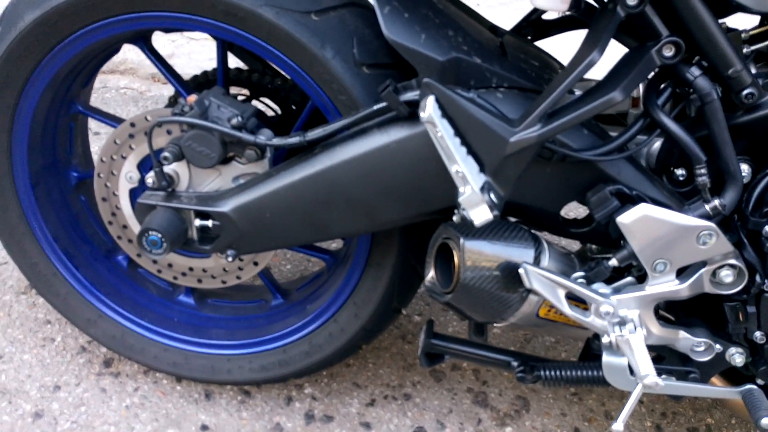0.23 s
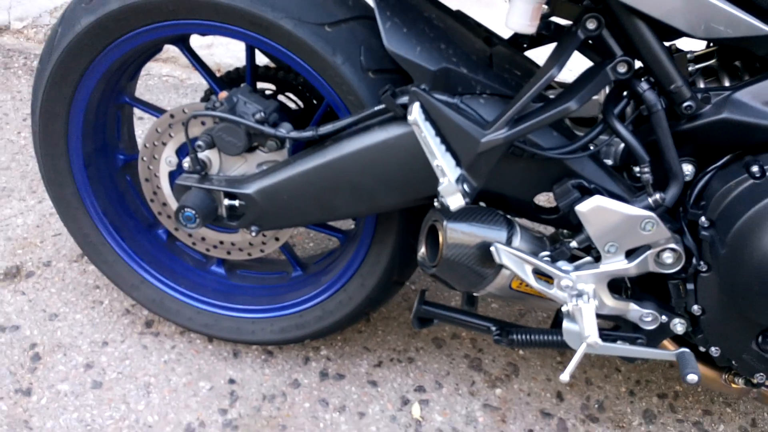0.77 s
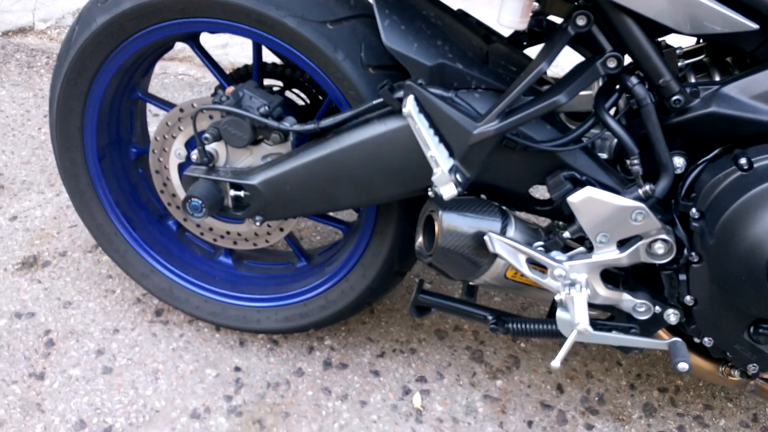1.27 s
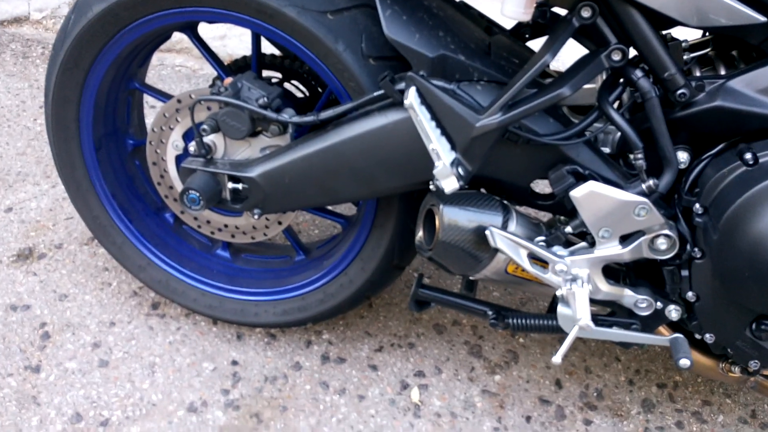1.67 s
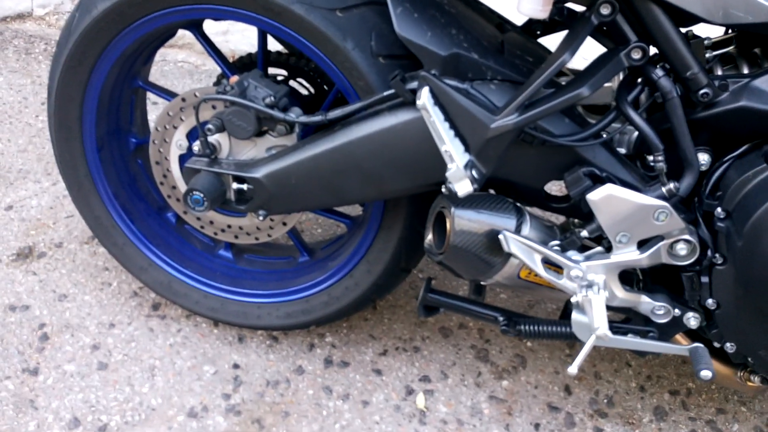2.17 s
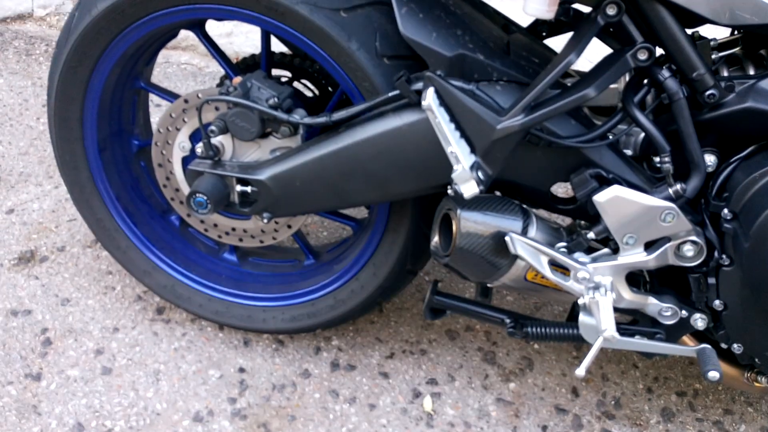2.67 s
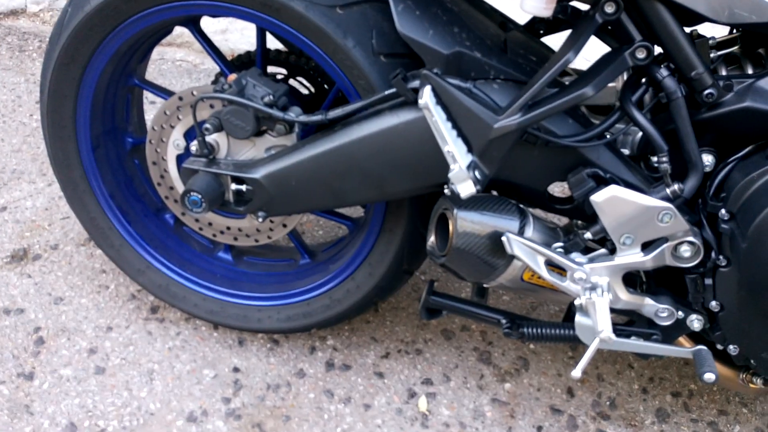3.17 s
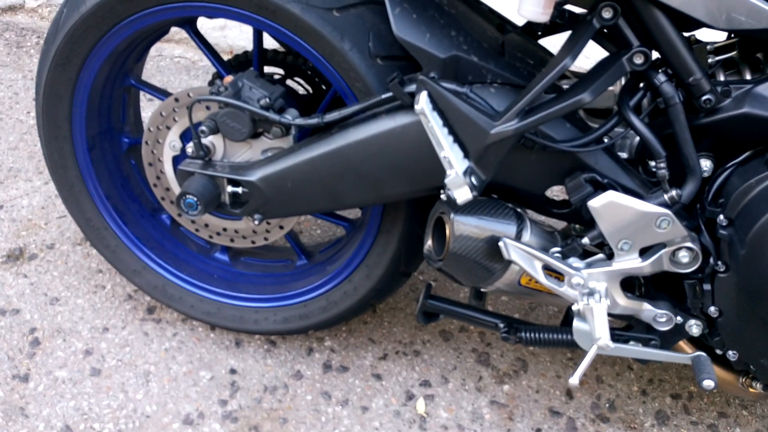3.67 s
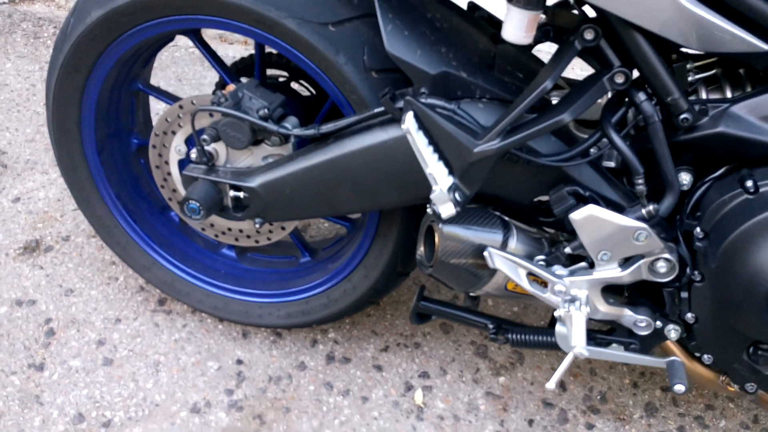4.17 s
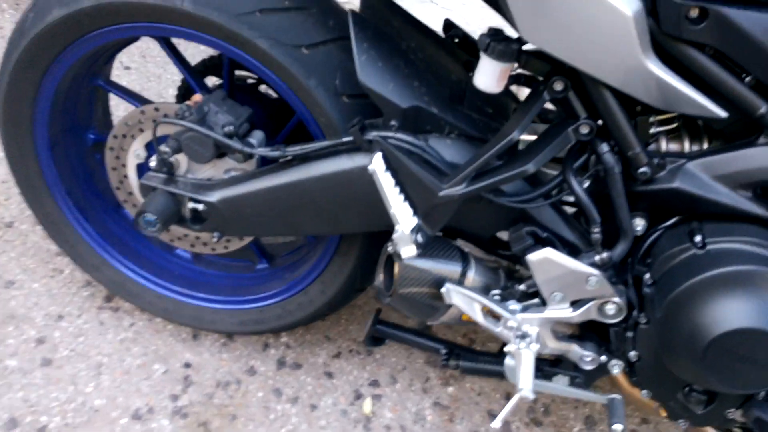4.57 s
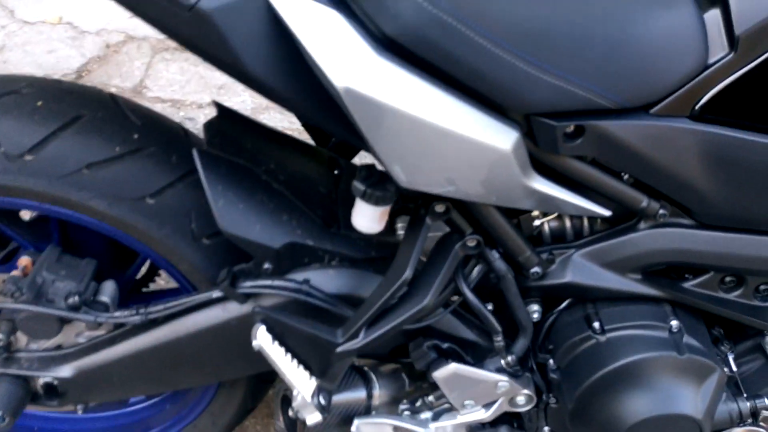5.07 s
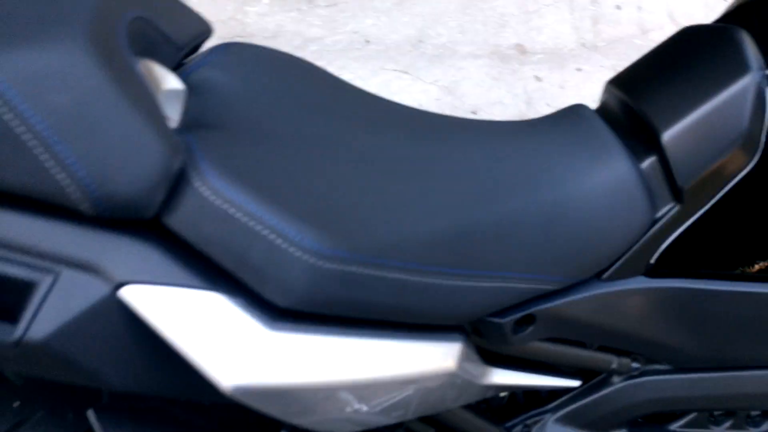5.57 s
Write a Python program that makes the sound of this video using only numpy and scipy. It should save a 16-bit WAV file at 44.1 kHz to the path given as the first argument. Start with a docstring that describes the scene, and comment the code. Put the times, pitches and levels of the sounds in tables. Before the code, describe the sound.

A parked three-cylinder motorcycle is revved in two quick double blips and one final single blip. Each barks sharply through the exhaust, then falls away in a drone with gurgling, backfire pops and, once, a hard knock. The engine finally drops to a quieter, stumbling idle with ticking valves. It is outdoors, on a phone microphone close to the silencer that slightly overloads on the peaks.

```python
"""A three-cylinder motorcycle on its stand is blipped five times, then drops to a stumbling idle.
On throttle, sharp firings bark through the pipe; off throttle, the cylinders pump a smooth falling
drone and unburnt fuel pops, with one hard knock. Gas rasps and gurgles; valves and chain clatter on top.
A phone close to the silencer catches exhaust wind, overloads on the loudest peaks and swings away at idle."""
import sys
import numpy as np
from scipy import signal
from scipy.fft import rfft, irfft
from scipy.io import wavfile
from scipy.ndimage import uniform_filter1d

SR = 44100
rng = np.random.default_rng(int(sys.argv[2]) if len(sys.argv) > 2 else 0)


def digitize_waveform(pressure):
    """Quantize a signal to 16-bit integers and store it at the path in sys.argv[1].

    Rows of a 2-D input are taken as channels; values are limited to [-1, 1].
    """
    field = np.atleast_2d(pressure).T
    bounded = np.clip(field, -1, 1)
    quanta = np.round(bounded * 32767).astype(np.int16)
    wavfile.write(sys.argv[1], SR, quanta)


N = 256220
T = np.arange(N) / SR
IDLE_START_S, IDLE_HZ = 4.1665, 29.8
BURBLE_HZ = 117  # below this firing rate some cycles half burn with the throttle shut
UNFUELLED_DB = -30  # a slug level below this means no fuel


def undb(db):
    """Decibels to gain."""
    return 10 ** (np.asarray(db) / 20)


def unit(x):
    """Scale each channel to RMS 1."""
    return x / np.sqrt(np.mean(x ** 2, axis=-1, keepdims=True))


def curve(hz, table):
    """Read (frequency, value) rows on a log-frequency axis."""
    f, value = np.transpose(table)
    return np.interp(np.log(np.maximum(hz, 1)), np.log(f), value)


def band(x, hz, width):
    """Resonance with gain 1 at the centre."""
    return signal.lfilter(*signal.iirpeak(hz, hz / width, SR), x)


def low(x, hz):
    """Two-pole low-pass."""
    return signal.lfilter(*signal.butter(2, hz, fs=SR), x)


def tail(kicks, decay_s):
    """Give each kick an exponential decay."""
    return signal.lfilter([1], [1, -np.exp(-1 / (decay_s * SR))], kicks)


def noise(colour, mono_hz):
    """Coloured stereo noise at RMS 1, narrowing to mono below mono_hz."""
    f = np.fft.rfftfreq(N, 1 / SR)
    mid, side = rfft(rng.standard_normal((2, N)))
    alike = 1 / (1 + (f / mono_hz) ** 2)
    mid, side = mid * np.sqrt(1 + alike), side * np.sqrt(1 - alike)
    return unit(irfft(undb(curve(f, colour)) * np.array([mid + side, mid - side]), N))


def wander(hz):
    """Smoothed random sample-and-hold; spread near 1."""
    hold = int(SR / hz)
    steps = np.repeat(rng.standard_normal(N // hold + 1), hold)
    return 1.53 * uniform_filter1d(uniform_filter1d(steps, hold), hold)[:N]


def clicks(times, gains):
    """Single-sample kicks."""
    return np.bincount(np.clip((np.asarray(times) * SR).astype(int), 0, N - 1), gains, N)


def bump(s, width_s):
    """Bell-shaped swell in time."""
    return np.exp(-.5 * ((T - s) / width_s) ** 2)


# Throttle blips: open t/s, shut t/s, top rate/Hz, drag build-up/s, drag share,
# first slug/dB, last slug/dB, first blast/dB, last blast/dB, roar/dB
THROTTLE_BLIPS = [(.081, 0.195, 128.2, 0.19, 0.99, 0, -2, -11, -5.5, -18.5),
                  (.327, 0.451, 206.8, .1, 1.0, -12, -6, -4.5, -2, -14),
                  (1.639, 1.753, 117.4, .1, 0.98, -2, -0.5, -27, -6, -21.5),
                  (1.875, 1.984, 186.6, .03, 0.99, -3, -8, -6, -2.5, -16.5),
                  (3.089, 3.219, 130.8, .06, 0.99, -0.2, -2, -20.5, -5.5, -20)]
# Idle stumbles: t/s, rate sag/Hz, slug dip/dB
IDLE_STUMBLES = [(4.29, 3.0, 5), (4.66, 2.4, .5), (4.91, 1.7, .5), (5.149, 1.5, .5), (5.321, 2.1, 0),
                 (5.45, 1.3, -1)]
def firing_rate():
    """Revs climb evenly on throttle, then drag pulls them down to a stumbling idle."""
    step, overrun_s = 1e-3, .014  # the flywheel gains a little longer than the fuel flows
    hz, shut, build_s, share = 63.25, -1, 1, .7
    rates = []
    for t in np.arange(0, T[-1] + step, step):
        blip = next((b for b in THROTTLE_BLIPS if b[0] - overrun_s / 2 <= t < b[1] + overrun_s), None)
        if blip:
            shut = blip[1] + overrun_s
            top_hz, build_s, share = blip[2:5]
            hz += (top_hz - hz) * min(step / (shut - t), 1)
        else:
            drag = 75 + .4 * hz + 35 * np.clip((hz - 112) / 10, 0, 1)  # extra above the fuel cut
            hz = max(hz - step * share * drag * min((t - shut) / build_s, 1), IDLE_HZ)
        rates.append(hz)
    sag = sum(sag_hz * bump(s, .05) for s, sag_hz, _ in IDLE_STUMBLES)
    return np.interp(T, step * np.arange(len(rates)), uniform_filter1d(rates, 12)) - sag


def crank(hz):
    """Firing cycles elapsed, nudged so a charge fires as each blip and the idle begin."""
    cycles = np.cumsum(hz) / SR
    for s in [b[0] for b in THROTTLE_BLIPS] + [IDLE_START_S]:
        miss = (cycles[int(s * SR)] + .5) % 1 - .5
        cycles -= miss * np.clip((T - s) / .03 + 1.05, 0, 1)
    return cycles


def fuel():
    """Levels (dB) of gas slug and pressure blast: ramped through each blip, softer at idle."""
    idle = T > IDLE_START_S - .012
    dips = sum(db * bump(s - .015, .015) for s, _, db in IDLE_STUMBLES)
    slug_db = np.where(idle, -2.5 - dips, -60.)
    blast_db = np.where(idle, -54, -80.)
    for opens, shuts, *_, slug0, slug1, blast0, blast1, _ in THROTTLE_BLIPS:
        on = (T >= opens - .003) & (T < shuts + .004)
        progress = np.clip((T - opens) / (shuts - opens), 0, 1)
        slug_db = np.where(on, slug0 + (slug1 - slug0) * progress, slug_db)
        blast_db = np.where(on, blast0 + (blast1 - blast0) * progress ** .43, blast_db)
    return slug_db, blast_db


# Off-throttle mix: firing rate/Hz, drone/dB, rasp/dB, clatter/dB, high hiss/dB
COAST_MIX = [(29.6, -39.5, -58.5, -35.5, -56.5), (42, -36.5, -58, -33, -46), (53.5, -23.5, -49, -33, -50.5),
             (61.9, -13.5, -35.5, -28, -40), (82.6, -12.5, -43.5, -30.5, -42),
             (100.84, -13, -41.5, -31.5, -44), (127.2, -7.5, -46, -28.5, -43), (164, -4, -35, -23.5, -39.5),
             (186.4, -4.5, -36.5, -22, -39.5), (203, -8.5, -26, -19, -35)]
# On-throttle drone: firing rate/Hz, level/dB
PULL_DRONE = [(60, -30.5), (80, -31.5), (105, -12.5), (170, -5), (205, -7)]
def faders(hz, slug_db):
    """Drone, rasp, clatter and hiss (dB) ride the revs; throttle adds a roar, each pop a puff."""
    drone_db, *noise_db = (curve(hz, np.array(COAST_MIX)[:, [0, k]]) for k in range(1, 5))
    opens, shuts, roar_db = np.array(THROTTLE_BLIPS)[:, [0, 1, -1]].T
    # the flow falters as the throttle moves
    open_dip_db = -3.5 * sum(bump(s - .0082, .0082) for s in opens)
    shut_dip_db = -3.5 * sum(bump(s + .018, .0082) for s in shuts)
    pulling = uniform_filter1d(1. * ((slug_db > UNFUELLED_DB) & (T < IDLE_START_S - .1)), 600)
    drone_db += pulling * (curve(hz, PULL_DRONE) - drone_db)
    drone_db += open_dip_db + shut_dip_db - 30 * (T > IDLE_START_S)
    roar = 0
    for start, end, db in zip(opens, shuts, roar_db):
        attack_db = -17 * np.clip(1 - (T - start) / .051, 0, 1)
        release = np.clip(1 - (T - end) / .012, 0, 1)
        roar += undb(db + attack_db) * (T > start) * release
    pop_s, crack_db, _ = np.transpose(AFTERFIRE)
    puff = undb(-19.5) * tail(clicks(pop_s, undb(crack_db)), decay_s=.011)
    swing_db = np.interp(T, *np.transpose(PHONE_SWING)[:2]) * np.clip((42 - hz) / 10, 0, 1)
    beds = undb(np.array(noise_db) + swing_db + open_dip_db)
    surges = [undb(-3) * roar + puff, roar + puff, undb(-19) * roar]
    return drone_db, *(20 * np.log10(np.hypot(beds, surges)))


# Drone partials: multiple of the firing rate, level/dB, growth/dB per octave of rate above 90 Hz
DRONE_PARTIALS = [(2 / 3, -24, 0), (4 / 3, -26, 0), (2, -21, 24), (8 / 3, -22, 3), (3, -10, 4),
                  (10 / 3, -24, 3), (4, -9, 0), (5, -11, 0), (6, -15, 0), (7, -24, 8), (8, -27, 10),
                  (9, -29, 10), (10, -31, 10)]
# Pipe EQ: f/Hz, level/dB
PIPE_EQ = [(55, -9), (100, -8), (175, 0), (200, -3), (230, -13), (295, -40), (350, -22), (410, -15),
           (480, -19), (600, -12), (680, -21), (750, -38), (850, -14), (1200, -22), (1800, -45)]
def drone(hz, cycles, level_db):
    """Cylinders pump a smooth tone coloured by the pipe; stray burns unsettle it at low revs."""
    phase = 2 * np.pi * (cycles - .3)  # the crest trails the valve opening
    unrest = np.clip((BURBLE_HZ - hz) / 15, 0, 1)
    tone = undb(1.3 * unrest * wander(30.5)) * np.cos(phase)
    for k, db, growth_db in DRONE_PARTIALS:
        db = db + curve(k * hz, PIPE_EQ) - curve(hz, PIPE_EQ)
        db += growth_db * np.log2(np.maximum(hz / 90, 1))
        drift = wander(22)
        gain = undb(db + (.7 + 2.8 * unrest) * drift)
        tone += gain * np.cos(k * phase - .9 * (k - 1) + 1.2 * unrest * drift[::-1])
    return np.sqrt(2) * undb(level_db) * tone


# Gas rasp colour: f/Hz, level/dB
RASP_EQ = [(250, -2), (450, -4.5), (700, 5), (1100, 8.5), (1500, -2.5), (1850, -14.5), (2500, -28),
           (7000, -58)]
# Hollow gurgle colour: f/Hz, level/dB
GURGLE_EQ = [(250, 1.5), (400, 9), (520, 13.5), (680, 8.5), (780, -22.5), (1500, -65)]
def exhaust_gas(hz, cycles, shut, rasp_db):
    """Gas rasps out as each valve opens and churns in the silencer when coasting at low revs."""
    rush = unit(1.2 + np.exp(-(cycles % 1) / .83))
    bark = unit(.19 + np.exp(-(cycles % 1) / .11))  # a burnt charge leaves more abruptly
    rasp = noise(RASP_EQ, 710) * np.where(shut, rush, bark) * undb(rasp_db + .5 * wander(29))
    churn = uniform_filter1d(shut * np.clip((BURBLE_HZ + 10 - hz) / 15, 0, 1), 600)
    gurgle = noise(GURGLE_EQ, 1200) * churn * rush
    return rasp + gurgle * undb(-28 + .5 * (rasp_db + 32.5) + 3 * wander(35))


# Valve and chain colour: f/Hz, level/dB
CLATTER_EQ = [(880, 2.5), (1500, -3), (1910, -7), (2490, -3.5), (3150, -2), (3940, -1), (4770, -6.5),
              (5820, 2.5), (6480, -1.5), (7910, -27), (9560, -37), (13000, -25)]
# Metallic tappet sheen: f/Hz, level/dB
TAPPET_EQ = [(1500, -65.5), (3000, -23.5), (3600, 19), (4100, 19), (4700, -16.5), (7000, -65)]
def valve_clatter(cycles, level_db):
    """Valves shut twice per firing, chopping bright noise into ticks."""
    tick = unit(.66 + np.exp(-((2 * cycles + .28) % 1) / .067))
    clatter = noise(CLATTER_EQ, 1200) * undb(level_db + wander(30))
    sheen = noise(TAPPET_EQ, 1100) * undb(-43 + .91 * wander(46))
    return tick * (clatter + sheen)


# Top-end air: f/Hz, level/dB
HISS_EQ = [(6000, -66), (7500, -29.5), (13000, -65), (14300, -22.5), (15200, 18.5), (15800, 23),
           (16400, -17)]
def high_hiss(level_db):
    """A thin, flickering hiss near 15.5 kHz."""
    return noise(HISS_EQ, 1200) * undb(level_db + 1.7 * wander(58))


def buffet(rasp_db):
    """Exhaust wind rumbles on the microphone ports."""
    rumble = noise([(15, -10), (30, 0), (50, -8), (100, -30), (400, -70)], mono_hz=24)
    return rumble * undb(-33 + .25 * (rasp_db + 35) + 2.5 * wander(6))


# Returns along the pipe: delay/s, level/dB, low-pass f/Hz
PIPE_ECHOES = [(.0117, -11, 300), (.0222, -3, 80)]
def thump(kicks):
    """A soft slug of gas rings pipe and silencer and echoes twice; peak 1 per unit kick."""
    def ring(x):
        slug = low(np.convolve(x, np.hanning(int(.0053 * SR)))[:len(x)], 246)
        body = signal.lfilter(*signal.butter(1, 40, "high", fs=SR), band(slug, 163.6, 142))
        echoes = sum(undb(db) * low(np.pad(body, (int(s * SR), 0))[:len(x)], hz)
                     for s, db, hz in PIPE_ECHOES)
        breath = .3 * band(slug, 60, 30)  # the whole pipe breathes
        honk = undb(19) * band(low(x, 356), 418, 62)
        return body + echoes + breath + honk
    return ring(kicks) / np.abs(ring(signal.unit_impulse(2000))).max()


# Silencer modes: f/Hz, width/Hz, level/dB
SILENCER_MODES = [(369, 195, 2.5), (652, 353, 0), (1124, 1050, -5.5), (1626, 1080, -7.5),
                  (4450, 1000, -27.5)]
def blast(kicks, modes=SILENCER_MODES):
    """A steep pressure front, roughened by turbulence, rings short modes."""
    def ring(x):
        return sum((-1) ** k * undb(db) * band(x, hz, width) for k, (hz, width, db) in enumerate(modes))
    turbulence = .069 * tail(kicks, decay_s=.0048) * rng.standard_normal(N)
    return low(ring(kicks + turbulence), 6700) / np.abs(ring(signal.unit_impulse(2000))).max()


def firings(hz, cycles, slug_db, blast_db):
    """Each firing thumps and barks a little differently; stray burns burble on the overrun."""
    at = np.flatnonzero(np.diff(np.floor(cycles)) > 0)
    slug_scatter, blast_scatter, stray_scatter = rng.standard_normal((3, len(at)))
    dice, delay = rng.random((2, len(at)))
    uneven_db = np.resize([0, -.6, -.2], len(at)) + 1.1 * slug_scatter  # three unequal cylinders
    fire_db = slug_db[at] + uneven_db
    half_burns = (dice < .4) & (hz[at] < BURBLE_HZ) & (fire_db < UNFUELLED_DB)
    strays = clicks(T[at] + delay / hz[at], half_burns * undb(-13.5 + 2.5 * stray_scatter))
    apart = np.clip((140 - hz[at]) / 50, 0, 1)  # at speed the slugs merge into the drone
    slugs = clicks(T[at], apart * undb(fire_db))
    # the front first sucks, just ahead of the crest of the slug
    fronts = clicks(T[at] + .001, -undb(blast_db[at] + uneven_db + 1.4 * blast_scatter))
    return thump(slugs + strays) + blast(fronts + .065 * strays)


# Afterfire pops, plus one ordinary firing near 3.05 s as the engine catches: t/s, crack level/dB, thump
# level/dB
AFTERFIRE = [(1.089, -2.5, -4), (1.098, -6.5, -2), (1.198, -24, -21), (1.324, -24, -2), (1.351, -14, -3),
             (1.418, -14, -13.5), (1.459, -30, -17.5), (1.563, -25, -8), (1.579, -11, -3),
             (1.6, -28, -18.5), (2.437, -9, -2), (2.448, -8, 0.5), (2.465, -7.5, -23), (2.501, -26.5, -15),
             (2.589, -33, -18.5), (2.618, -29, -18), (2.688, -28, -1.5), (2.714, -13.5, -7.5),
             (2.74, -27, -11), (2.794, -28.5, -18.5), (2.866, -19.5, -25.5), (2.987, -14, -2),
             (3.009, -22, -2.5), (3.049, -30, -7.5), (3.41, -16, -3.5), (3.477, -19, -10),
             (3.573, -14, -16.5), (3.621, -14.5, -2.5), (3.642, -24, -2.5), (3.709, -29, -3.5),
             (3.754, -16, -20), (3.852, -17.5, -16), (3.908, -20.5, -11), (3.923, -35, -2),
             (3.971, -18, -5), (3.993, -16.5, -1.5), (4.014, -24, -0.5), (4.045, -43, -7),
             (4.074, -31, -5.5), (4.104, -40, -5.5), (4.135, -28, -6)]
def pops():
    """Unburnt fuel lights in the hot pipe: a crack over a thump. Near 3.05 s the same sound is a single charge
    firing as the engine catches."""
    s, crack_db, thump_db = np.transpose(AFTERFIRE)
    return thump(clicks(s, undb(thump_db))) + blast(clicks(s, undb(crack_db)))


# Knock cue: t/s, level/dB
KNOCK_CUE = [(3.03, -12)]
# Knock resonances: f/Hz, width/Hz, level/dB
KNOCK_RING = [(800, 150, 0), (1400, 260, -5), (3500, 2500, -20)]
def knock():
    """One hard knock with a short midrange ring."""
    s, db = np.transpose(KNOCK_CUE)
    return blast(clicks(s, undb(db)), KNOCK_RING)


def spread(pipe):
    """The pipe reaches the left port first; tarmac and bodywork return it unequally to the two."""
    side = .1 * np.roll(pipe, 200) + .025 * np.roll(band(pipe, 670, 2200), 60)
    return np.array([pipe + side, np.roll(pipe, 6) - side])


# Stereo lean: f/Hz, left minus right/dB
STEREO_LEAN = [(60, .9), (200, .1), (700, 2), (1300, 4.5), (2400, 2.5), (4400, 5), (8000, 3), (15000, 7)]
# The phone swings away at idle: t/s, engine noise trim/dB, left minus right/dB
PHONE_SWING = [(4.1, 2.5, -0.5), (4.38, 3, -0.5), (4.48, 0.2, -0.8), (5.81, 0.5, 1)]
def pan(stereo):
    """The treble leans left; the balance shifts as the phone swings."""
    lean_db = curve(np.fft.rfftfreq(N, 1 / SR), STEREO_LEAN) / 2
    swing_db = np.interp(T, *np.transpose(PHONE_SWING)[::2]) / 2
    return irfft(rfft(stereo) * undb([lean_db, -lean_db]), N) * undb([swing_db, -swing_db])


def scene():
    """Revs and fuel drive the pipe and the noise layers around it."""
    hz = firing_rate()
    cycles = crank(hz)
    slug_db, blast_db = fuel()
    drone_db, rasp_db, clatter_db, hiss_db = faders(hz, slug_db)
    pipe = drone(hz, cycles, drone_db) + firings(hz, cycles, slug_db, blast_db) + pops() + knock()
    gas = exhaust_gas(hz, cycles, slug_db < UNFUELLED_DB, rasp_db)
    top = valve_clatter(cycles, clatter_db) + high_hiss(hiss_db)
    return pan(spread(pipe) + gas + top + buffet(rasp_db))


def record(dry):
    """The phone squashes and clips the loudest peaks and cuts the top."""
    squashed = dry / (1 + np.abs(dry / 1.53) ** 5) ** (1 / 5)
    top_cut = signal.ellip(8, .2, 80, 16200, fs=SR, output="sos")
    return np.clip(signal.sosfilt(top_cut, np.clip(squashed, -1, 1)), -1, 1)


dry = scene()
out = record(dry)
digitize_waveform(out)
```